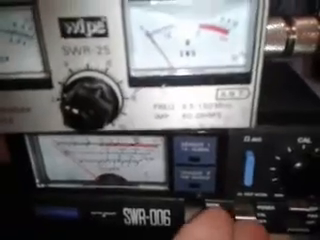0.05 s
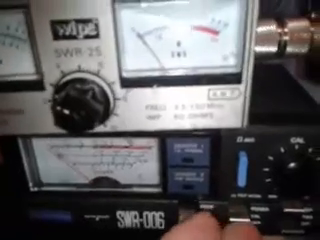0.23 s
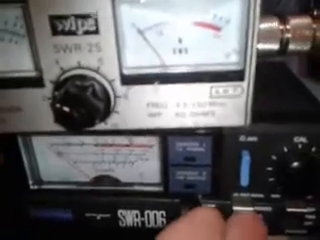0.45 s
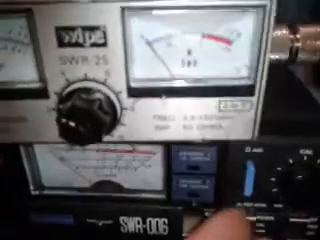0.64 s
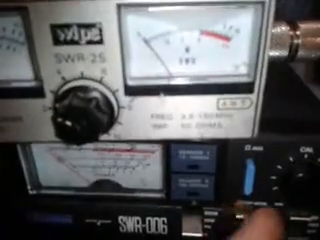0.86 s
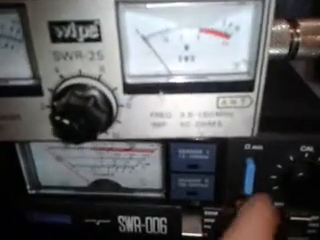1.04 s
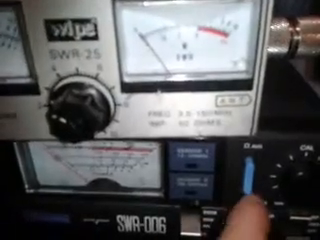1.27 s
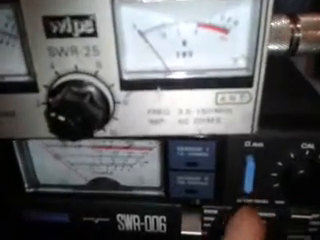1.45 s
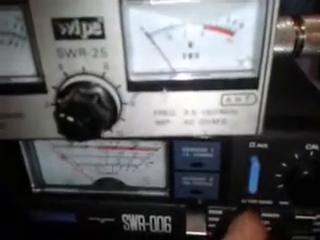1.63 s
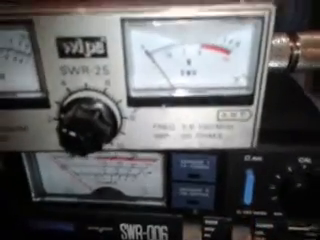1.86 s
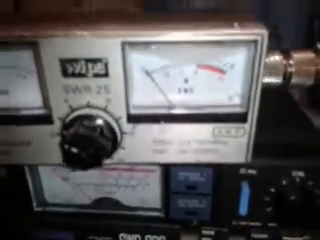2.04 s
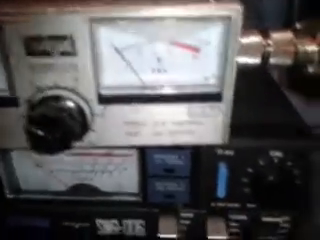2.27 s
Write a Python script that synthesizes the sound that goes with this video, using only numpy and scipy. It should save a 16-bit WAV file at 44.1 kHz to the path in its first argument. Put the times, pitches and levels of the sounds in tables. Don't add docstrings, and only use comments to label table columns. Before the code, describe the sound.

Switch clicks on a metal meter case: three loud snaps with faint fingernail ticks and bench knocks

```python
import sys
import numpy as np
from scipy import signal
from scipy.fft import rfft, irfft
from scipy.io import wavfile

SR = 44100
rng = np.random.default_rng(int(sys.argv[2]) if len(sys.argv) > 2 else 0)


def wrap_up_sound(samples):
    columns = np.atleast_2d(samples).T
    tamed = np.clip(columns, -1, 1)
    steps = np.round(tamed * 32767).astype(np.int16)
    wavfile.write(sys.argv[1], SR, steps)


def volts_from_decibels(level):
    exponent = np.asarray(level, float) / 20
    return 10 ** exponent


N = 101474
TIME_S = np.arange(N) / SR


def rms_one(x):
    return x / np.sqrt(np.mean(x ** 2) + 1e-20)


def coloured(spectrum):
    hz, db = np.transpose(spectrum)
    bin_hz = np.maximum(np.arange(N // 2 + 1) * SR / N, 1)
    gain = volts_from_decibels(np.interp(np.log(bin_hz), np.log(hz), db, left=-90))
    return rms_one(irfft(rfft(rng.standard_normal(N)) * gain, N))


def dying(start_s, t60_s, rise_s):
    t = np.maximum(TIME_S - start_s, 0)
    return (1 - np.exp(-t / rise_s)) * volts_from_decibels(-60 * t / t60_s)


def ring(x, hz, t60_s):
    r = volts_from_decibels(-60 / (t60_s * SR))
    w = 2 * np.pi * hz / SR
    return signal.lfilter([0, np.sin(w)], [1, -2 * r * np.cos(w), r * r], x + 1e-18)


def swing_up(clicks, hz):
    build_cycles, build_max_s = 8.3, 0.017
    t60_s = min(build_cycles / hz, build_max_s)
    gain = 2 * (1 - volts_from_decibels(-60 / (t60_s * SR)))
    return gain ** 2 * ring(ring(clicks, hz, t60_s), hz, t60_s)


def strike(contacts, modes):
    spread_db = 1.5
    start_s, peak_db = np.transpose(contacts)
    at = (start_s * SR).astype(int)
    out = np.zeros(N)
    for hz, level_db, t60_s in modes:
        clicks = np.zeros(N)
        clicks[at] = volts_from_decibels(peak_db + level_db + spread_db * rng.standard_normal(len(at)))
        out += ring(swing_up(clicks, hz), hz, t60_s)
    return out


# frequency in Hz, level in dB per Hz.
ROOM_HISS = [(53, -80.5), (90, -24), (420, -9), (535, -7.5), (1400, -16), (1890, -14), (2270, -25),
             (6670, -31), (7600, -43.5), (9880, -86.5), (16700, -120)]
# frequency in Hz, width in Hz, level in dB.
FAN_TONES = [(475, 16, -59.5), (551, 21, -60), (680, 30, -83.5), (1213.6, 14, -64)]


def room():
    out = volts_from_decibels(-52.5) * coloured(ROOM_HISS)
    for hz, width_hz, db in FAN_TONES:
        out += volts_from_decibels(db) * rms_one(ring(rng.standard_normal(N), hz, 2.56 / width_hz))
    return out


def rumble():
    spectrum = [(15, -3), (45, 4.5), (70, -6.5), (110, -37), (200, -41)]  # Hz, dB per Hz
    return volts_from_decibels(-78.5) * coloured(spectrum)


# start in seconds, board level in dB, sway level in dB.
KNOCKS = [
    (.505, -50, -57.5),
    (1.285, -54, -60),
    (1.477, -35.5, -37),
    (2.248, -67, -49),
]


def sway():
    rise_s, held_after_s, release_s = 0.022, 0.283, .015
    out = np.zeros(N)
    for start_s, _, sway_db in KNOCKS:
        t = TIME_S - start_s
        held = 1 / (1 + np.exp(np.clip((t - held_after_s) / release_s, -50, 50)))
        for hz, t60_s, mode_db in [(44.3, 0.71, 0), (49.2, .25, -5)]:
            swing = np.sin(2 * np.pi * hz * t + 1.4)
            out += volts_from_decibels(sway_db + mode_db) * held * dying(start_s, t60_s, rise_s) * swing
    return out


# frequency in Hz, level in dB, t60 in seconds.
BOARD_MODES = [(164, -12, .08), (234, 0, 0.11), (310, 3, 0.11), (407, -7.5, 0.065), (528, 3, 0.14),
               (654, -6, 0.1), (795, -6.5, 0.037), (954, -2, 0.02), (1110, -1.5, 0.046), (1420, 2, 0.033)]


def knocks():
    rebound_s, rebound_db = 0.01203, -8
    out = np.zeros(N)
    for start_s, db, _ in KNOCKS:
        out += strike([(start_s, db), (start_s + rebound_s, db + rebound_db)], BOARD_MODES)
    return out


# frequency in Hz, level in dB, t60 in seconds.
PANEL_MODES = [(1120, -12, .04), (1324, -10.5, .04), (1460, -2, 0.08), (1665, 5, 0.066), (1783, 2.5, 0.065),
               (2030, -5, .05)]
# frequency in Hz, level in dB per Hz.
RUB_HISS = [(800, -21), (2500, 7), (5000, -6.5), (6500, 0), (7600, -12.5)]
# start in seconds, end in seconds, ring level in dB, hiss level in dB.
RUBS = [
    (0.294, 0.554, -57, -71),
    (1.006, 1.049, -56, -73),
    (1.249, 1.29, -51, -60.5),
    (1.482, 1.526, -62, -54.5),
    (1.78, 1.843, -58, -57),
    (2.003, 2.122, -51, -58),
    (2.187, 2.226, -50, -58.5),
]


def rubs():
    edge_s, damping = .015, 0.54
    noise = rng.standard_normal(N)
    hiss = coloured(RUB_HISS)
    ringing = rms_one(sum(volts_from_decibels(db) * ring(noise, hz, damping * t60_s) for hz, db, t60_s in PANEL_MODES))
    out = np.zeros(N)
    for start_s, end_s, ring_db, hiss_db in RUBS:
        press = np.clip(np.minimum(TIME_S - start_s, end_s - TIME_S) / edge_s, 0, 1)
        out += press * (volts_from_decibels(ring_db) * ringing + volts_from_decibels(hiss_db) * hiss)
    return out


# frequency in Hz, level in dB per Hz.
GRIT = [(300, -15), (1200, 4), (2200, 5.5), (3800, -5), (5200, -10), (7500, -14)]
# start in seconds, ping level in dB, grit level in dB, share of full ring time.
TICKS = [(0.0369, -34.5, -52, 0.4), (.460, -49.5, -67, 0.54), (0.515, -46, -44, 0.55),
         (1.145, -57.5, -47, 0.47), (1.426, -50, -44.5, 0.57), (1.467, -45, -54, 0.88),
         (1.477, -32, -38.5, 0.78), (1.562, -45, -64, 0.44), (1.61, -58, -50, 0.59), (1.652, -48, -51, .8),
         (1.7508, -34.5, -43.5, 0.61), (1.763, -47, -59, 0.54)]


def ticks():
    grit_t60_s, grit_rise_s = 0.15, .0009
    grit = coloured(GRIT)
    out = np.zeros(N)
    for start_s, ping_db, grit_db, share in TICKS:
        damped_modes = [(hz, db, t60_s * share) for hz, db, t60_s in PANEL_MODES]
        out += strike([(start_s, ping_db)], damped_modes)
        out += volts_from_decibels(grit_db) * dying(start_s, grit_t60_s * share, grit_rise_s) * grit
    return out


# start in seconds, peak in dB.
LATCH = [
    (1.8102, -33.5),
    (1.8200, -49),
]
# frequency in Hz, level in dB, t60 in seconds.
LATCH_MODES = [(1685, -2.5, 0.084), (2020, -1.5, 0.093), (2340, -9, 0.0115), (2780, 0, 0.014),
               (3190, -1.5, 0.023), (3730, -10, 0.0076), (4340, -14, 0.0073), (5300, -17, 0.006),
               (6600, -15.5, .008)]


def latch():
    grit_t60_s, grit_rise_s = 0.29, 0.0031
    grit = volts_from_decibels(-46) * dying(LATCH[0][0], grit_t60_s, grit_rise_s) * coloured(GRIT)
    return strike(LATCH, LATCH_MODES) + grit


# start in seconds, peak in dB.
FIRST_SNAP = [
    (0.7355, -43.5),
    (0.7383, -16),
    (0.7441, -28.5),
]
SECOND_SNAP = [
    (1.2800, -23),
    (1.2810, -14.5),
    (1.2942, -28),
]
THIRD_SNAP = [
    (2.2104, -43),
    (2.2234, -16),
    (2.2331, -30),
]
# frequency in Hz, level in dB, t60 in seconds.
FIRST_MODES = [(653, -17, 0.081), (878, -16.5, 0.071), (1156, -19, 0.059), (1303, -6, 0.064),
               (1440, 0.5, 0.07), (1572, -8, 0.068), (1657, -0.5, 0.087), (1747, -4.5, 0.046),
               (1638, 8.5, 0.02), (2750, -27, 0.013), (3430, -25, 0.024), (4000, -26, 0.0095),
               (5820, -29, 0.0094), (6800, -31, 0.01)]
SECOND_MODES = [(511, -19, 0.098), (1331, -2, 0.056), (1695, 10.5, 0.043), (1654, 2.5, .1),
                (1762, -9, 0.11), (2134, -2.5, 0.041), (2463, -1.5, 0.029), (2915, -7.5, 0.021),
                (3650, -2, 0.021), (4200, -8, 0.025), (5490, -5, .015), (6160, -18.5, 0.037),
                (6410, 8.5, .006), (6720, -12, 0.029)]
THIRD_MODES = [(521, -29, 0.14), (653, -19, 0.2), (1179, -8.5, 0.11), (1257, -5.5, 0.052), (1475, -3, 0.09),
               (1746, -3.5, 0.074), (1714, 8, 0.029), (1830, -6, 0.13), (1880, -15, 0.04),
               (2430, -10.5, 0.03), (2864, -13, .04), (3340, -14.5, 0.096), (4300, -17, 0.011),
               (5560, -8.5, 0.0098)]
# frequency in Hz, level in dB per Hz.
FIRST_RATTLE = [(120, -62), (200, -36), (587, -16.5), (1160, -13), (1650, 3.5), (2200, -31), (3410, -27),
                (7500, -49.5), (9750, -76.5), (16500, -120)]
SECOND_RATTLE = [(120, -78), (200, -50.5), (497, -22), (1080, -17.5), (1700, -5), (2590, -19.5),
                 (6160, -15), (7500, -22.5), (9750, -71), (16500, -120)]
THIRD_RATTLE = [(120, -60), (200, -37), (504, -8.5), (845, -14.5), (1700, -5), (2590, -16), (5970, -28.5),
                (7500, -32.5), (9750, -82), (16500, -120)]
# level in dB, t60 in seconds.
RATTLES = [
    (-22, .13),
    (-20, .14),
    (-23, .14),
]


def snap(contacts, modes, rattle_spectrum, rattle):
    rattle_db, rattle_t60_s = rattle
    main_blow_s = contacts[1][0]
    envelope = volts_from_decibels(rattle_db) * dying(main_blow_s, rattle_t60_s, 0.0023)
    return strike(contacts, modes) + envelope * coloured(rattle_spectrum)


def snaps():
    first = snap(FIRST_SNAP, FIRST_MODES, FIRST_RATTLE, RATTLES[0])
    second = snap(SECOND_SNAP, SECOND_MODES, SECOND_RATTLE, RATTLES[1])
    third = snap(THIRD_SNAP, THIRD_MODES, THIRD_RATTLE, RATTLES[2])
    return first + second + third


def scene():
    air = room() + knocks() + rubs() + ticks() + latch() + snaps()
    port = signal.butter(4, 220.5, "high", fs=SR, output="sos")
    return (signal.sosfilt(port, air) + rumble() + sway())[None]


def roll_off(x):
    return signal.sosfilt(signal.butter(12, 8310, fs=SR, output="sos"), x)


def record(dry):
    ceiling, knee_share, offset = .66, .7, .0044
    cut = signal.sosfilt(signal.cheby1(10, .5, 7210, fs=SR, output="sos"), dry)
    excess = cut - np.clip(cut, -ceiling, ceiling)
    over = signal.sosfilt(signal.butter(2, 600, "high", fs=SR, output="sos"), excess)
    mix = cut - knee_share * over + offset
    return roll_off(mix)


dry = scene()
out = record(dry)
wrap_up_sound(out)
```